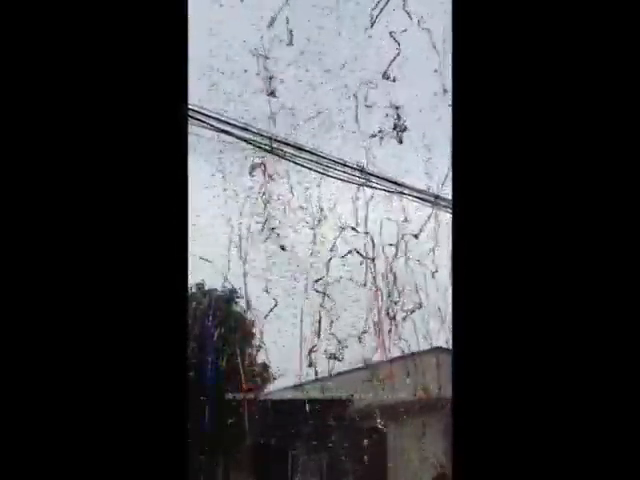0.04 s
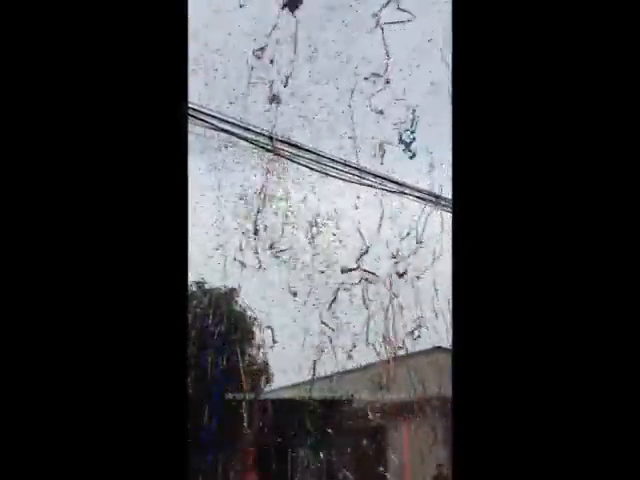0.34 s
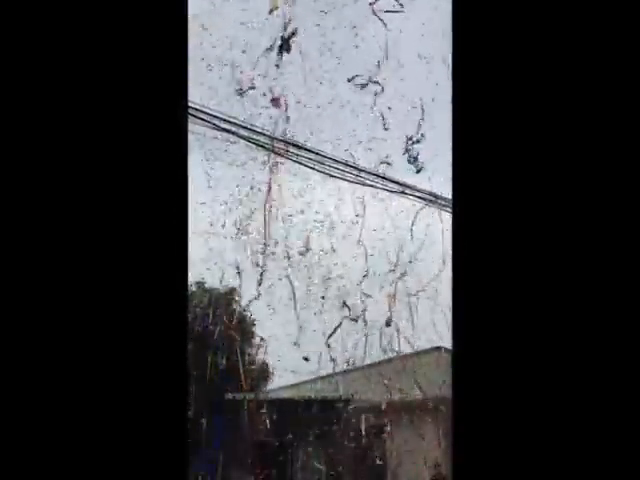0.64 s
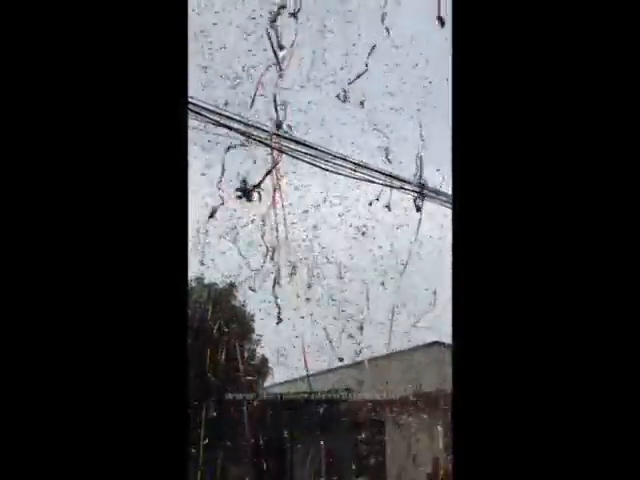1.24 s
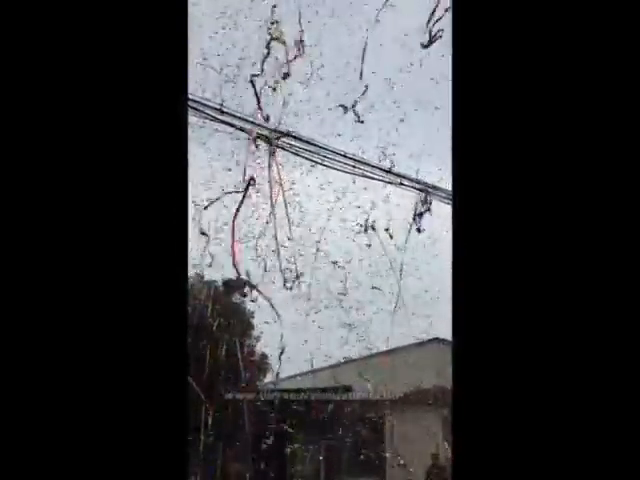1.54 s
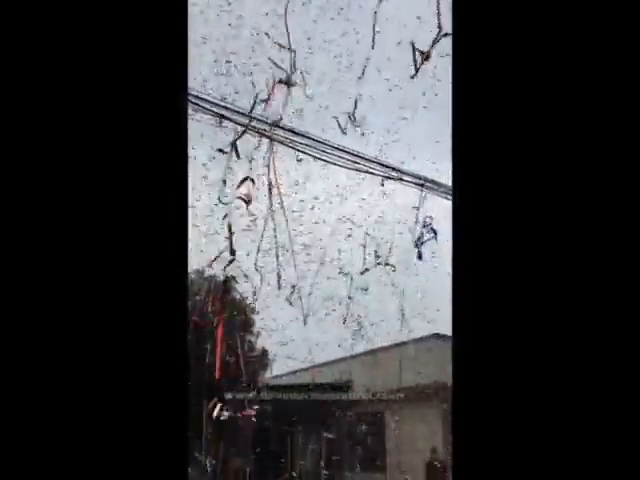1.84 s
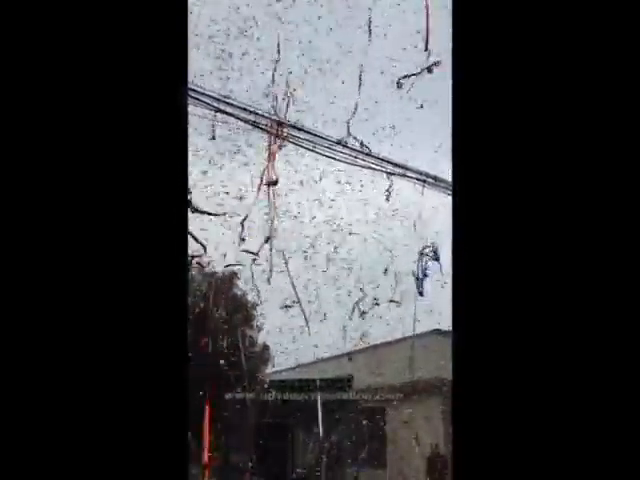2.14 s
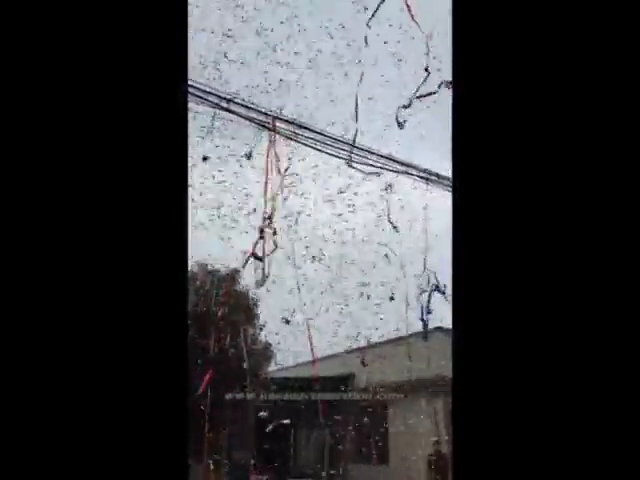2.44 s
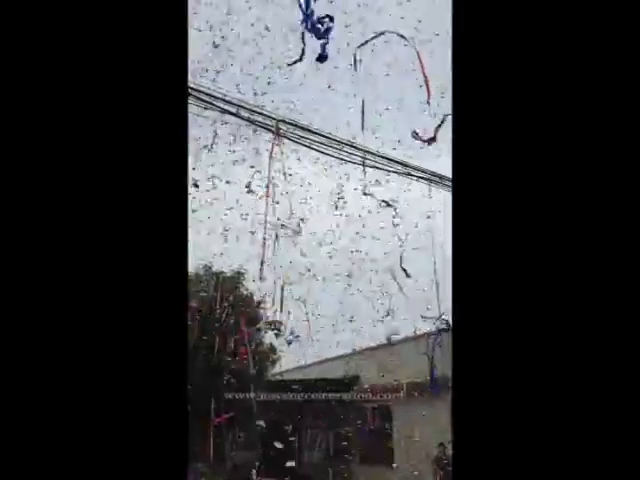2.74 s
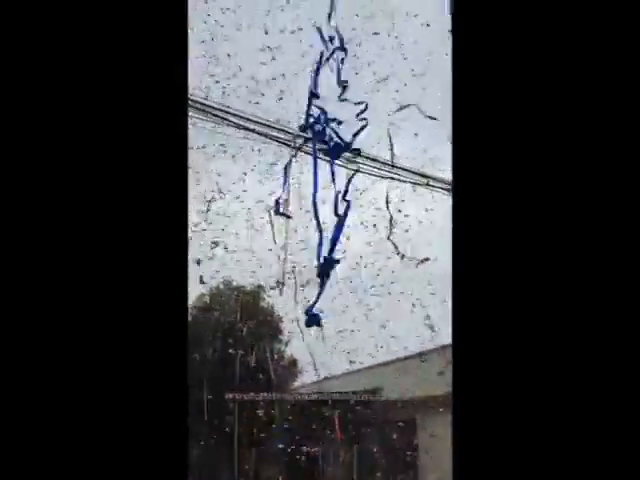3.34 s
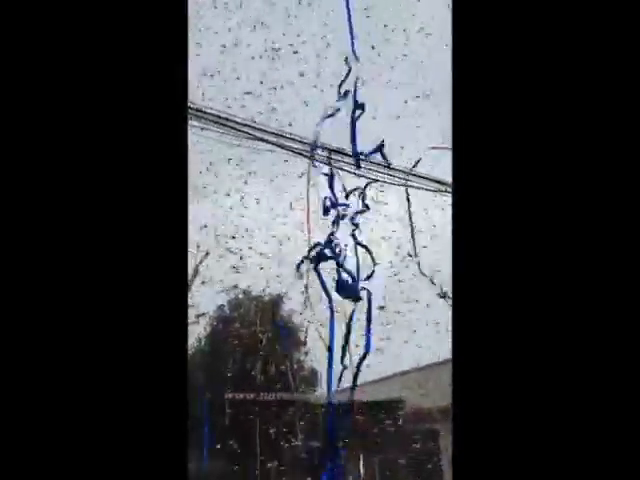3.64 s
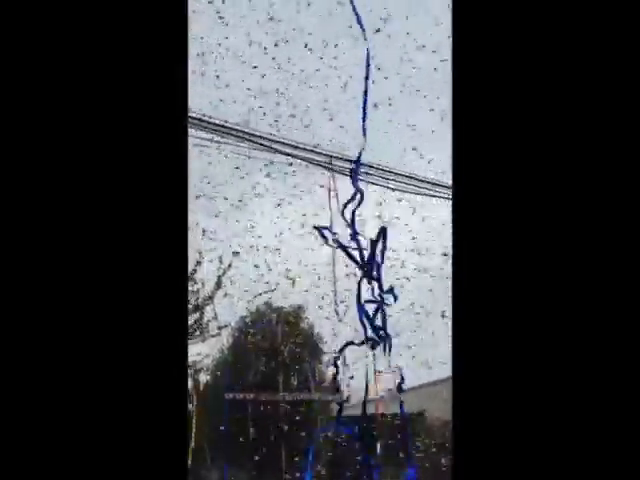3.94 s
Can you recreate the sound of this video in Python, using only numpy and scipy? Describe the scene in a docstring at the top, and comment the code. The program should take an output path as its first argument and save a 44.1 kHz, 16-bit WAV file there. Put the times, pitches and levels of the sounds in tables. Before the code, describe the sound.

Paper confetti showers down on a street in a dense hiss and patter that slowly thins. Single flakes tick and streamers crumple close to a small microphone, over a faint outdoor rumble. A soft microphone bump comes last.

```python
"""A hiss and patter of paper confetti showering down on a street, slowly thinning.
Countless distant flakes merge into the hiss; nearer ones click and larger scraps crackle as they land.
Single flakes tick and streamers crumple close by. Two dull knocks ring farther off, over a faint
outdoor rumble and a thin tone. At the end the one small microphone gets a soft bump."""
import sys
import numpy as np
from scipy import signal
from scipy.fft import rfft, irfft, next_fast_len
from scipy.io import wavfile
from scipy.ndimage import uniform_filter1d

SR = 44100
rng = np.random.default_rng(int(sys.argv[2]) if len(sys.argv) > 2 else 0)


def unload_audio(sound):
    """Save the sound as a 16-bit wav file, at the path given as the first command line argument."""
    columns = np.transpose(np.atleast_2d(sound))
    # keep every value between -1 and 1, then stretch to whole-number steps
    steps = np.round(np.clip(columns, -1, 1) * 32767)
    wavfile.write(sys.argv[1], SR, steps.astype(np.int16))


N = 176400


def amp(db):
    """Decibels to gain."""
    return 10 ** (np.asarray(db) / 20)


def unit(x):
    """Scales to rms 1."""
    return x / np.sqrt(np.mean(x ** 2) + 1e-20)


def spectrum_db(points, hz):
    """Interpolates a spectrum on a log-frequency axis."""
    freq_hz, level_db = np.transpose(points)
    return np.interp(np.log(hz + 1), np.log(freq_hz), level_db)


def filtered(x, gain):
    """Filters x by gain(hz)."""
    size = next_fast_len(len(x) + 2048)
    return irfft(rfft(x, size) * gain(np.fft.rfftfreq(size, 1 / SR)), size)[:len(x)]


def bandpass(x, hz, width_oct):
    """Gaussian band around hz; width_oct is its sigma."""
    return filtered(x, lambda f: np.exp(-.5 * (np.log2((f + 1) / hz) / width_oct) ** 2))


def add(mix, start_s, sound):
    """Mixes a sound in at start_s."""
    part = mix[max(round(start_s * SR), 0):][:len(sound)]
    part += sound[:len(part)]


def impacts(samples, per_s, spread_db):
    """Random impulses of either sign: many small, few large."""
    size = amp(spread_db * np.minimum(rng.exponential(1, samples), 5))
    return size * rng.choice([-1, 1], samples) * (rng.random(samples) < per_s / SR)


def wash(field_db, patchy_db, flicker_db, fft_size):
    """Noise shaped by field_db(t, hz), with random patches and flicker; rms 1."""
    hop = fft_size // 4
    t = np.arange(N // hop + 2)[:, None] * hop / SR
    hz = np.fft.rfftfreq(fft_size, 1 / SR)
    real, imag, patches = rng.standard_normal((3, len(t), len(hz)))
    patches = unit(uniform_filter1d(uniform_filter1d(patches, size=10, axis=0), size=18, axis=1))
    flicker = unit(uniform_filter1d(rng.standard_normal(len(t)), size=6))[:, None]
    frames = (real + 1j * imag) * amp(field_db(t, hz) + patchy_db * patches + flicker_db * flicker)
    return unit(signal.istft(frames.T, nperseg=fft_size, noverlap=fft_size - hop)[1][:N])


# Shower strength: time_s, relative_db
SHOWER = [(0, 1.5), (.15, 1.5), (.3, 2.1), (.5, 2), (.9, 1.7), (1.3, 1.66), (1.62, 1.1), (1.69, -0.4),
          (1.8, 1.5), (2.12, 0.34), (2.3, -0.7), (2.5, 0), (2.65, -2), (2.92, -0.5), (3.08, -2),
          (3.2, -1.5), (3.37, -1.5), (3.44, -1.5), (3.51, -2.5), (3.64, -0.6), (4, 0.5)]
def shower_db(t):
    """Strength of the confetti fall at times t."""
    return np.interp(t, *np.transpose(SHOWER))


# Spectrum of landing paper: freq_hz, relative_db
PAPER_SPECTRUM = [(100, -31), (500, -16.5), (800, -15), (1400, -11.5), (2200, -5), (3600, -1.5), (6200, 1),
                  (7700, -1), (9300, 1.5), (12000, -1), (15300, -1)]
def far_confetti(level_db=-48, body_hz=4000, body_follow=.84):
    """Distant flakes merge into a hiss that loses body as the shower thins."""
    def field_db(t, hz):
        follow = 1 + body_follow / (1 + (hz / body_hz) ** 2)
        return spectrum_db(PAPER_SPECTRUM, hz) + follow * shower_db(t)
    return amp(level_db) * wash(field_db, patchy_db=1.4, flicker_db=.5, fft_size=512)


def near_confetti(level_db=-52, flakes_per_s=5500, sizes=12, decay_cycles=.56):
    """Flakes of many sizes land, each a click of a cycle or two."""
    t, patter = np.arange(256) / SR, np.zeros(N)
    for hz in np.linspace(2490, 15100, sizes):
        flake = np.exp(-t * hz / decay_cycles) * np.cos(2 * np.pi * hz * t)
        landings = impacts(N, flakes_per_s / sizes, spread_db=3)
        patter += unit(signal.oaconvolve(landings, flake)[:N])
    patter = filtered(patter, lambda f: amp(spectrum_db(PAPER_SPECTRUM, f)))
    return amp(level_db) * unit(patter * amp(shower_db(np.arange(N) / SR)))


def scraps(level_db=-56.5, scraps_per_s=380, sizes=48, decay_s=.011):
    """Larger scraps flex and land one by one, each with its own papery pitch."""
    t, crackle = np.arange(1024) / SR, np.zeros(N)
    for hz in np.geomspace(899, 8000, sizes):
        burst = rng.standard_normal(len(t)) * np.exp(-t / decay_s)
        scrap = unit(bandpass(np.pad(burst, len(t)), hz, width_oct=.055))
        landings = impacts(N, scraps_per_s / sizes, spread_db=1.5)
        gain = np.sqrt(hz) * amp(spectrum_db(PAPER_SPECTRUM, hz))
        crackle += gain * signal.oaconvolve(landings, scrap, "same")
    return amp(level_db) * unit(crackle * amp(2 * shower_db(np.arange(N) / SR)))


# Outdoor rumble: freq_hz, relative_db
RUMBLE_SPECTRUM = [(15, -54), (28, -27), (45, -6), (60, 5), (95, -6), (140, -4), (195, -1.5), (280, -7),
                   (400, -9.5), (520, -17.5), (1000, -14), (2500, -40)]
def street_rumble(level_db=-69.5):
    """Low, slightly uneven outdoor noise."""
    field_db = lambda t, hz: spectrum_db(RUMBLE_SPECTRUM, hz)
    return amp(level_db) * wash(field_db, patchy_db=1.56, flicker_db=.4, fft_size=2048)


# Close flakes: strike_s, snap_peak_db, pitch_hz, width_oct
FLAKE_TICKS = [(.0255, -32, 8000, .5), (.282, -32, 6200, .25), (.2905, -34, 8600, .35),
               (0.3985, -32, 7200, 0.39), (.5892, -28, 10900, 0.45), (.653, -40, 7500, 0.59),
               (.8901, -38, 7300, .46), (1.1237, -25, 12000, 0.42), (1.796, -31, 7800, 0.9),
               (1.9808, -38.5, 3550, .22), (2.139, -31, 8100, 0.56), (2.4378, -35, 6000, 0.55),
               (2.6047, -25, 11700, 0.4), (2.749, -33, 4100, .25), (2.755, -29, 4200, 0.38),
               (2.877, -27, 8550, .46), (2.8816, -22, 8700, .42), (3.006, -29.3, 4000, .3),
               (3.0165, -46, 2790, 0.17), (3.1668, -32, 9700, .46), (3.409, -31, 8500, .55),
               (3.416, -28.5, 7700, .55), (3.749, -35, 3500, 0.64), (3.8456, -35, 7400, .35),
               (3.8896, -28, 7500, 0.59), (3.9068, -28, 7100, 0.55)]
def flake_tick(snap_peak_db, pitch_hz, width_oct, shiver_db=-1.5, delay_s=.0004, decay_cycles=6):
    """A stiff flake snaps against something near, then shivers. Returns offset_s, sound."""
    t = np.arange(-128, 1024) / SR
    snap = bandpass(1. * (t == 0), pitch_hz, width_oct)
    envelope = (t > delay_s) * np.exp(-abs(t) * pitch_hz / decay_cycles)
    shiver = unit(bandpass(envelope * rng.standard_normal(len(t)), pitch_hz, width_oct))
    tick = snap + amp(shiver_db) * snap.std() * shiver
    return t[0], amp(snap_peak_db) / snap.max() * tick


# Swells of the tone: peak_s, level_db
TONE_SWELLS = [(.09, -72), (.235, -70), (.3, -72), (.55, -67), (.8, -80), (1.19, -84), (2.18, -76),
               (3.84, -76)]
def thin_tone(pitch_hz=959, half_width_hz=13, sigma_s=.028):
    """A faint tone of narrowband noise comes and goes."""
    t = np.arange(N) / SR
    swells = sum(amp(db) * np.exp(-.5 * ((t - peak_s) / sigma_s) ** 2) for peak_s, db in TONE_SWELLS)
    resonance = lambda f: 1 / (1 + ((f - pitch_hz) / half_width_hz) ** 2)
    return swells * unit(filtered(rng.standard_normal(N), resonance))


# Crumpling streamers: peak_s, rise_s, decay_s, level_db, centre_hz, width_oct
STREAMER_RUSTLES = [(.2, 0.025, 0.06, -46, 9000, 2), (0.206, .018, .03, -56.5, 2290, .15),
                    (.248, 0.022, 0.1, -50, 3230, 0.76), (.284, 0.02, 0.024, -44.5, 6800, 1.7),
                    (0.396, 0.0045, 0.01, -42.5, 5470, 1), (.553, .012, 0.0099, -59, 2100, 0.26),
                    (.614, 0.008, 0.014, -48, 3650, .5), (.725, 0.0092, 0.11, -50.5, 3240, 0.75),
                    (.74, 0.0071, .02, -55, 3150, .1), (0.797, .008, 0.014, -45, 8000, 1.1),
                    (.864, 0.0066, 0.0068, -50.5, 2610, 0.35), (0.888, .01, 0.025, -46.5, 8000, 1.1),
                    (.965, 0.0087, 0.018, -45.5, 8000, 1), (1.029, 0.0073, 0.0098, -57.5, 1990, 0.32),
                    (1.231, 0.031, 0.03, -57, 2280, 0.34), (1.25, 0.05, 0.01, -46, 6000, 1.6),
                    (1.424, .006, 0.02, -46.5, 4800, 0.69), (1.498, 0.0054, 0.079, -48.5, 4000, 1.14),
                    (1.61, 0.0088, 0.013, -55, 2400, 0.37), (1.797, .003, 0.0079, -41.5, 6300, 1.2),
                    (1.983, .003, .006, -50, 3650, 0.14), (2.016, 0.0034, 0.016, -52, 3700, 0.2),
                    (2.076, 0.007, 0.01, -53, 2600, 0.35), (2.142, 0.007, 0.048, -44.5, 7500, 1.5),
                    (2.437, 0.0046, .012, -50, 4300, 0.65), (2.478, 0.0091, 0.017, -49, 10000, 0.59),
                    (2.72, 0.007, 0.018, -46.5, 5300, 0.9), (2.746, 0.018, 0.0096, -50, 3920, 0.24),
                    (2.814, 0.0086, 0.032, -41, 6900, 1.45), (2.885, .003, .008, -44, 9500, 0.74),
                    (2.967, 0.0067, .012, -50, 7160, 0.61), (3.013, 0.0051, 0.012, -56.5, 3220, 0.41),
                    (3.17, 0.025, 0.033, -49, 10000, 1.8), (3.298, .008, 0.011, -52, 6500, 0.18),
                    (3.414, .006, 0.018, -53, 7500, 0.81), (3.575, 0.016, .018, -54, 4000, 0.77),
                    (3.745, 0.042, 0.0077, -55, 3040, 0.56), (3.894, 0.0062, 0.036, -49, 7000, 1.8),
                    (3.973, 0.004, .015, -48, 8000, 0.68)]
def streamer_rustle(rise_s, decay_s, level_db, centre_hz, width_oct):
    """A streamer crumples in a quick swell of tiny creases. Returns offset_s, sound."""
    t = np.arange(SR // 2) / SR - .1
    creases = bandpass(impacts(len(t), per_s=12000, spread_db=2.5), centre_hz, width_oct)
    swell = np.where(t < 0, np.exp(-(t / rise_s) ** 2), np.exp(-abs(t) / decay_s))
    return t[0], amp(level_db) * swell * unit(creases)


# Dull knocks: start_s, gain_db, time_scale, tilt_db_per_oct, width_scale
KNOCKS = [(.204, -58, 0.42, -4.5, 4), (2.152, -60.5, 0.93, 1.5, .8)]
# Their resonances, before scaling: pitch_hz, width_hz, relative_db, rise_s, decay_s
KNOCK_MODES = [(191, 30, -6, 0.0094, 0.024), (356.6, 16, -.5, .036, .026), (415, 40, -9, .008, .1),
               (660, 60, -3, 0.0092, .028), (1074, 76, -2, 0.012, 0.024), (1680, 100, -1, .006, .016)]
def knock(gain_db, time_scale, tilt_db_per_oct, width_scale, pivot_hz=356.6):
    """A distant hollow knock: the upper resonances speak first, a low one blooms after them."""
    t, ring = np.arange(SR // 2) / SR, 0
    for hz, width_hz, relative_db, rise_s, decay_s in KNOCK_MODES:
        attack = np.minimum(t / (rise_s * time_scale), 1) ** 2
        decay = np.exp(-np.maximum(t / time_scale - rise_s, 0) / decay_s)
        step_rad = np.sqrt(2 * np.pi * width_hz * width_scale / SR)
        wander_rad = step_rad * np.cumsum(rng.standard_normal(len(t)))  # widens the resonance
        gain = amp(relative_db + tilt_db_per_oct * np.log2(hz / pivot_hz))
        ring += gain * attack * decay * np.sin(2 * np.pi * hz * t + wander_rad)
    return amp(gain_db) * np.sqrt(2) * ring


def microphone_bump(gain_db=-36.5, start_hz=440, end_hz=90, fall_s=.0021, decay_s=.0021):
    """A soft bump on the microphone: one push that slows as it dies."""
    t = np.arange(SR // 20) / SR
    hz = end_hz + (start_hz - end_hz) * np.exp(-t / fall_s)
    envelope = t / decay_s * np.exp(1 - t / decay_s)
    return -amp(gain_db) * envelope * np.sin(2 * np.pi * np.cumsum(hz) / SR)


def scene():
    """All sources at one microphone, the same in both channels."""
    mix = far_confetti() + near_confetti() + scraps() + street_rumble() + thin_tone()
    for source, events in (streamer_rustle, STREAMER_RUSTLES), (flake_tick, FLAKE_TICKS):
        for time_s, *settings in events:
            offset_s, sound = source(*settings)
            add(mix, time_s + offset_s, sound)
    for start_s, *settings in KNOCKS:
        add(mix, start_s, knock(*settings))
    add(mix, start_s=3.9713, sound=microphone_bump())
    return np.array([mix, mix])


# Microphone port dips: centre_hz, width_hz, gain_db
PORT_DIPS = [(4890, 290, -2.5), (10400, 340, -5)]
def record(dry):
    """The microphone's bass roll-off and two narrow dips of its port, then the band limit."""
    low_cut_hz, high_cut_hz = 36, 15290
    port = lambda f: amp(sum(db * np.exp(-((f - hz) / width) ** 2) for hz, width, db in PORT_DIPS))
    low_pass = signal.firwin(1023, high_cut_hz, window=("kaiser", 8), fs=SR)
    bass_cut = signal.sosfilt(signal.butter(2, low_cut_hz, "high", fs=SR, output="sos"), dry)
    return np.array([signal.oaconvolve(filtered(x, port), low_pass, "same") for x in bass_cut])


dry = scene()
out = record(dry)
unload_audio(out)
```